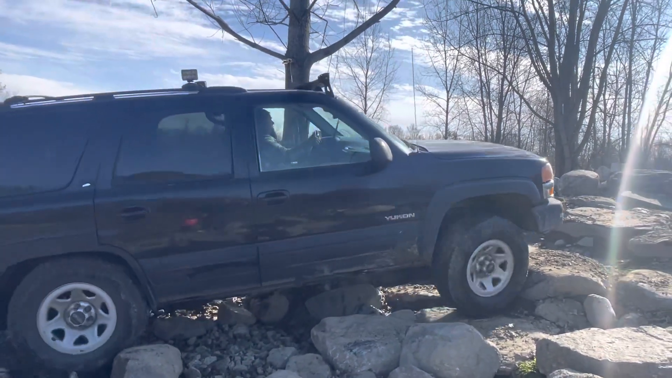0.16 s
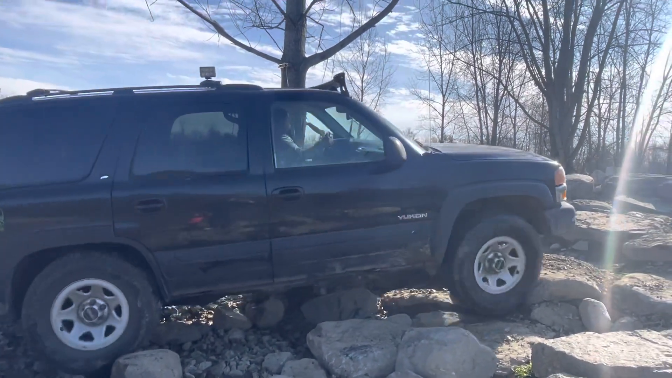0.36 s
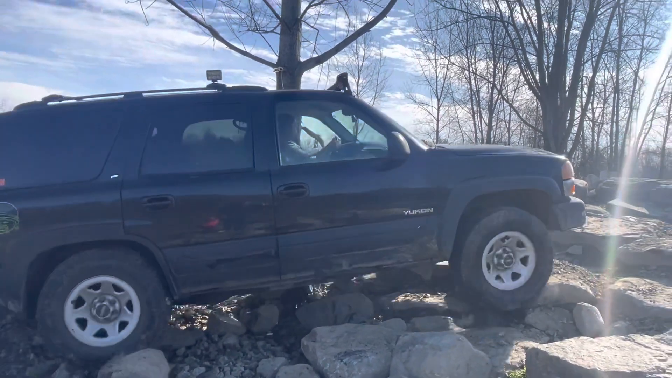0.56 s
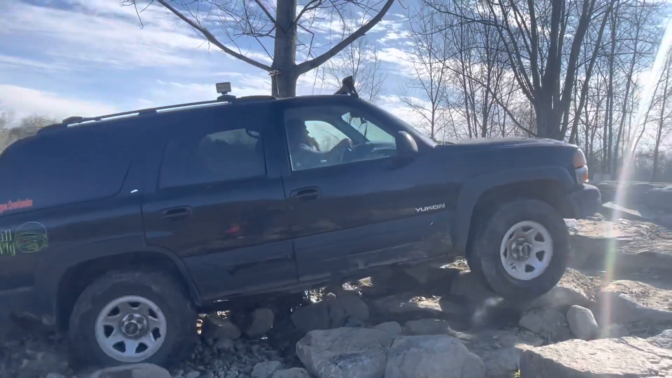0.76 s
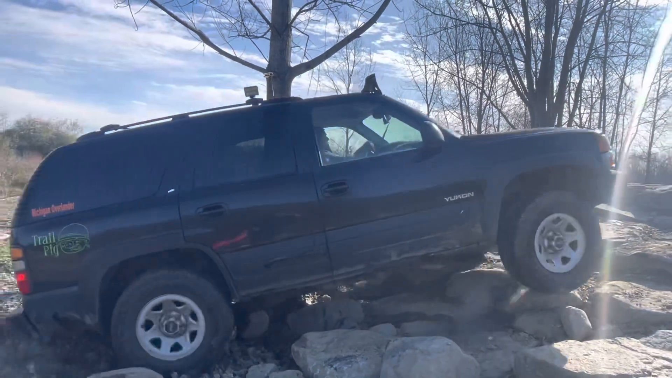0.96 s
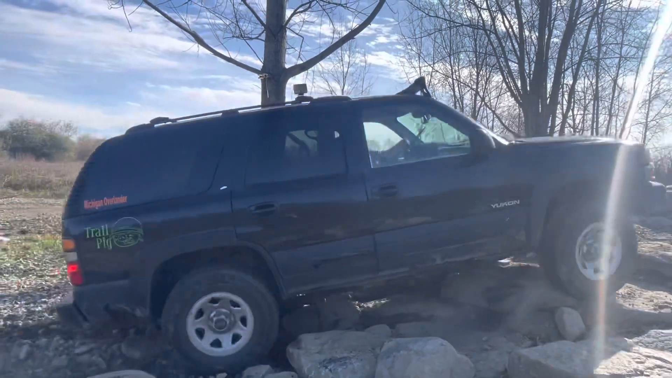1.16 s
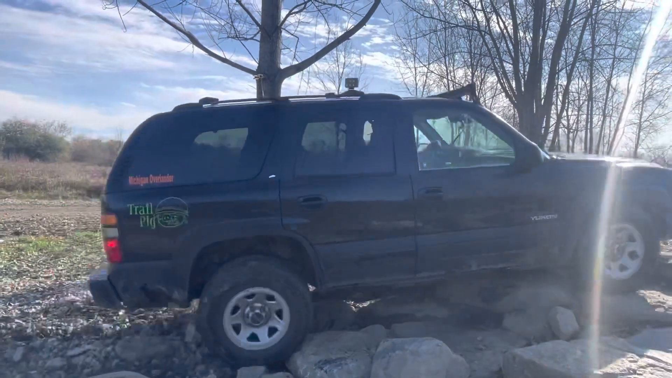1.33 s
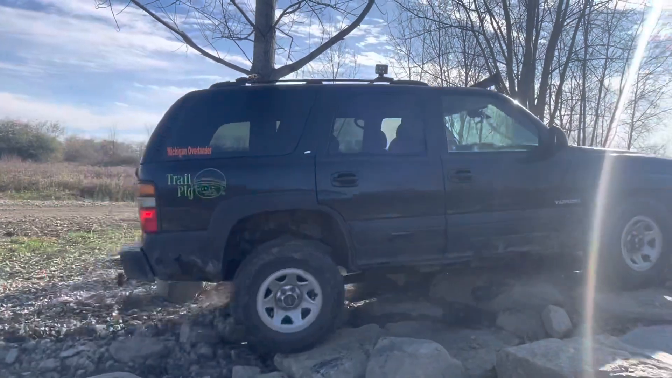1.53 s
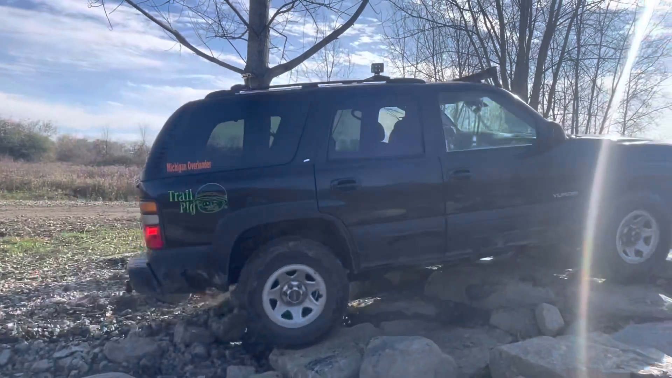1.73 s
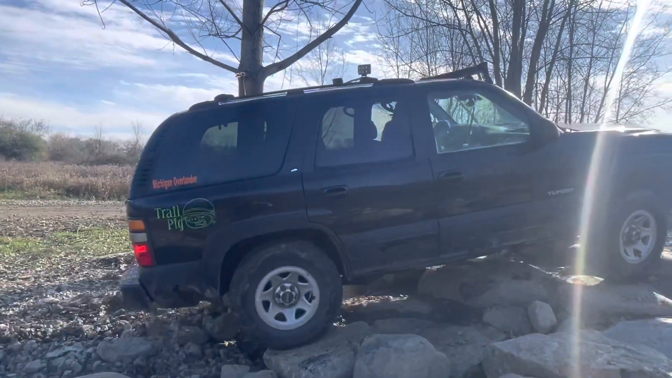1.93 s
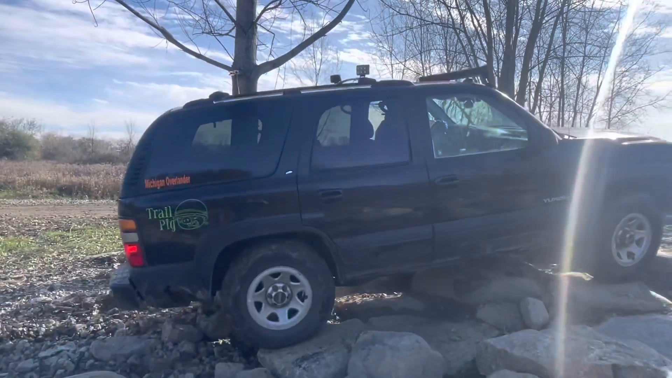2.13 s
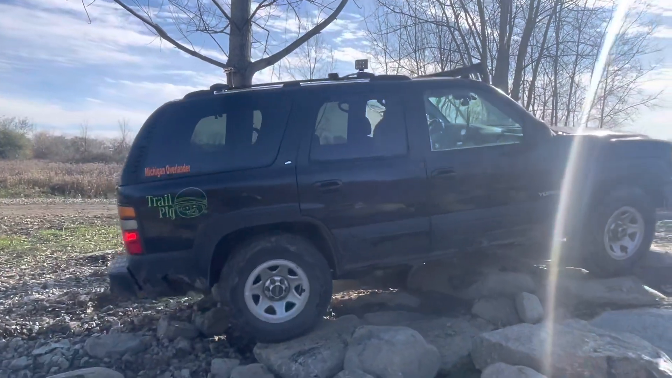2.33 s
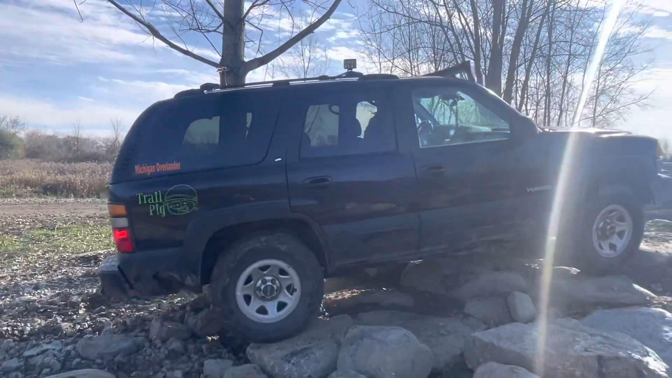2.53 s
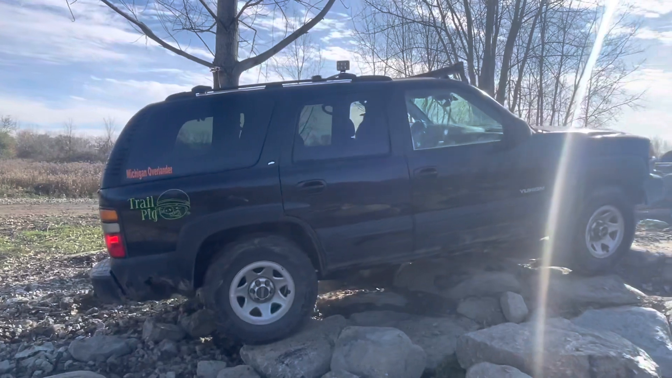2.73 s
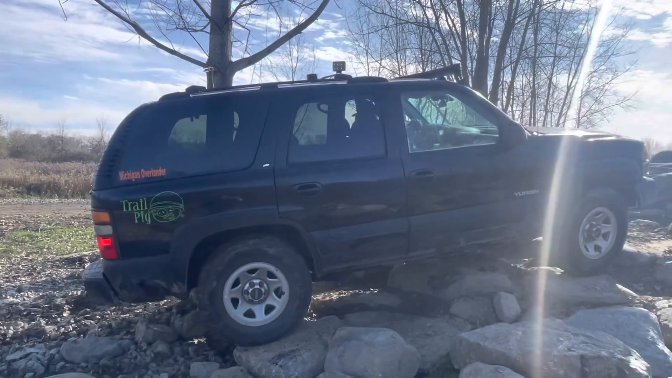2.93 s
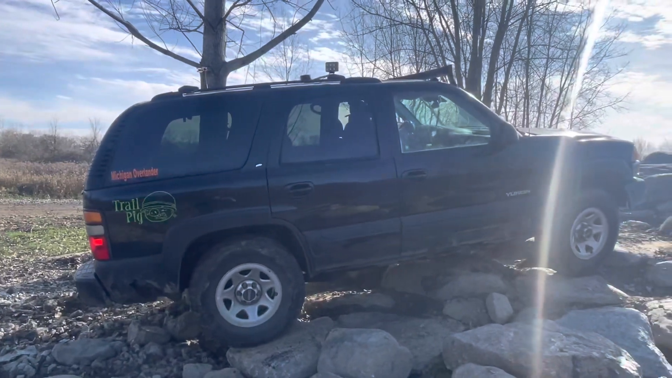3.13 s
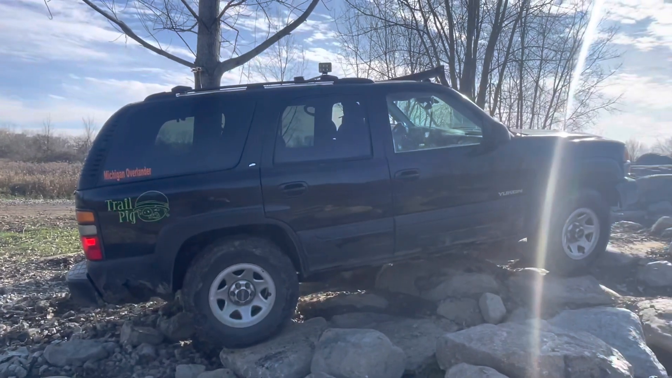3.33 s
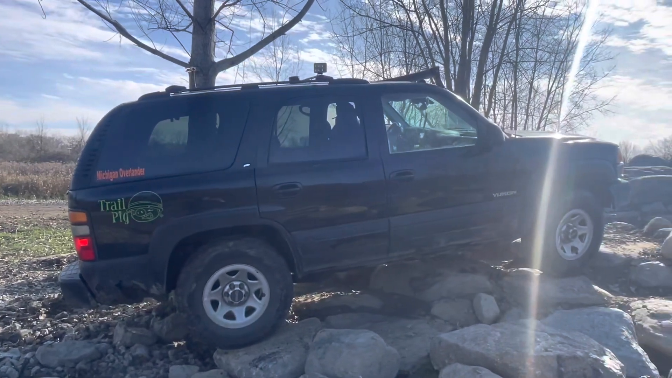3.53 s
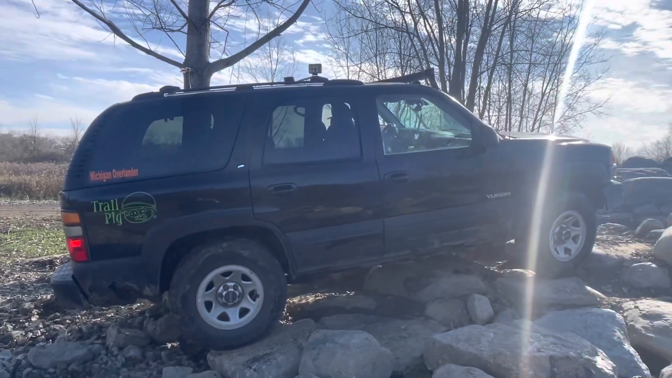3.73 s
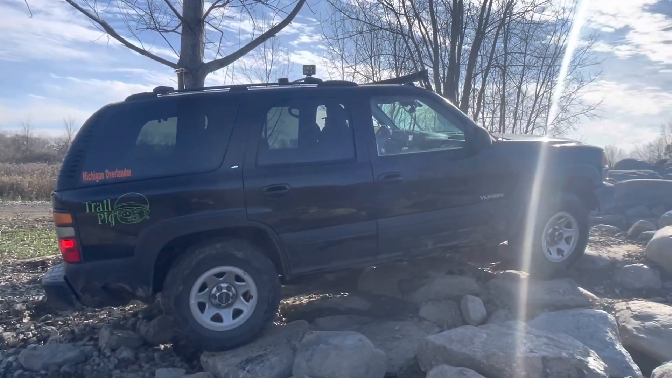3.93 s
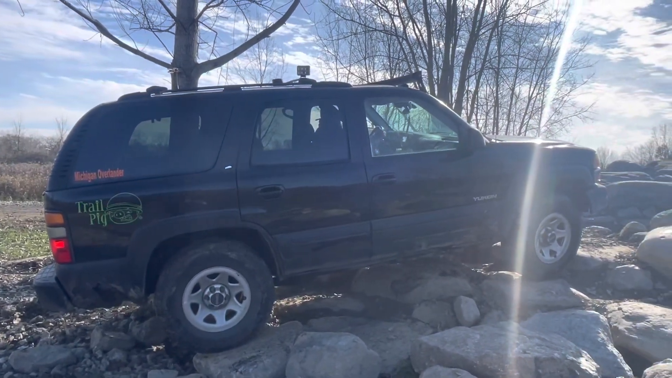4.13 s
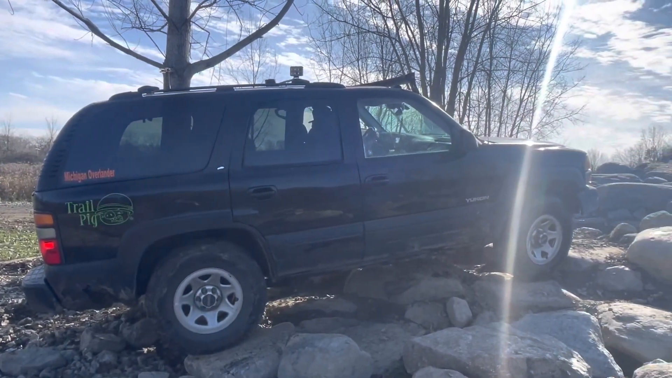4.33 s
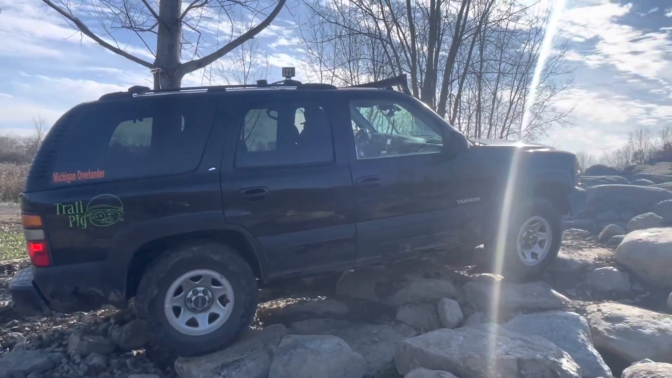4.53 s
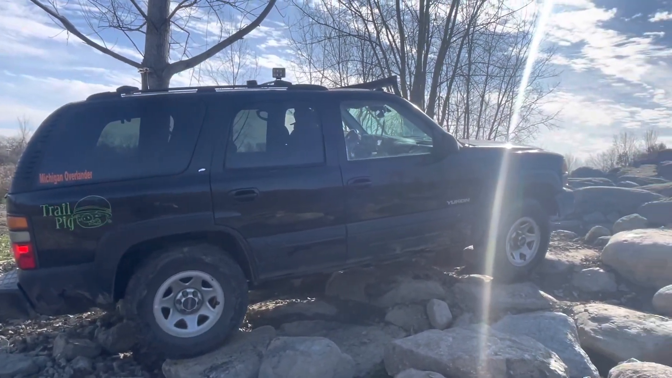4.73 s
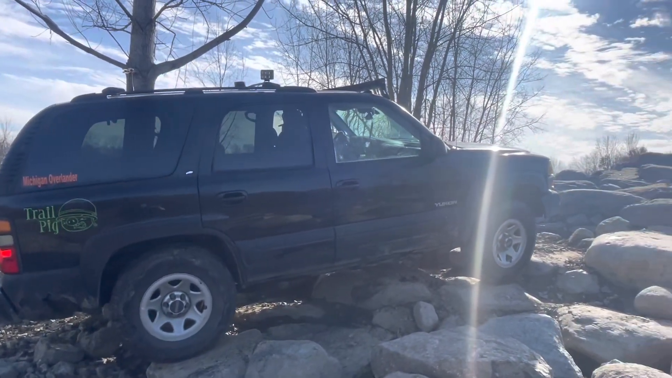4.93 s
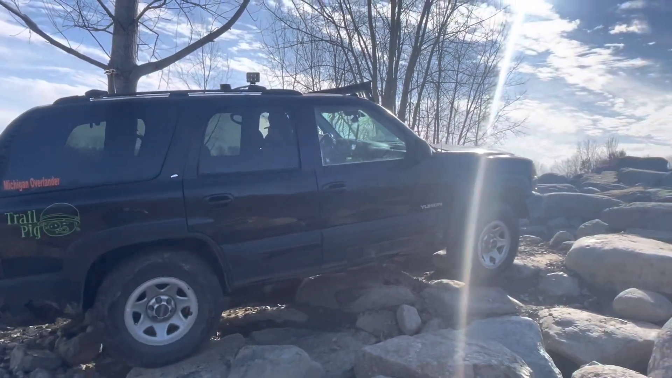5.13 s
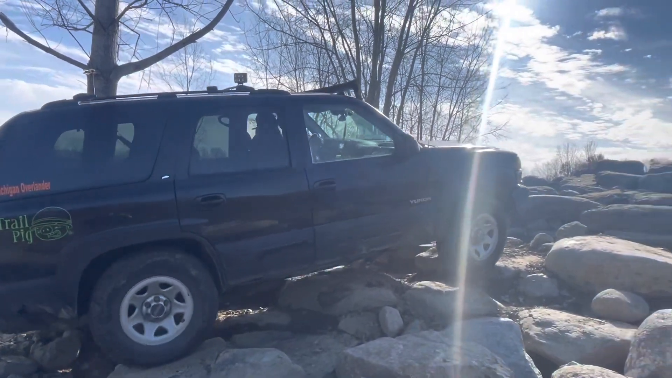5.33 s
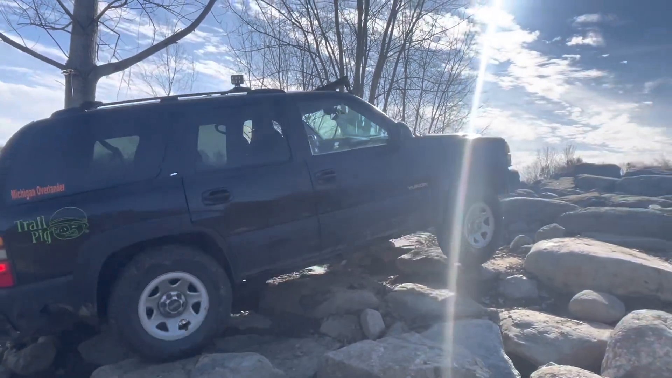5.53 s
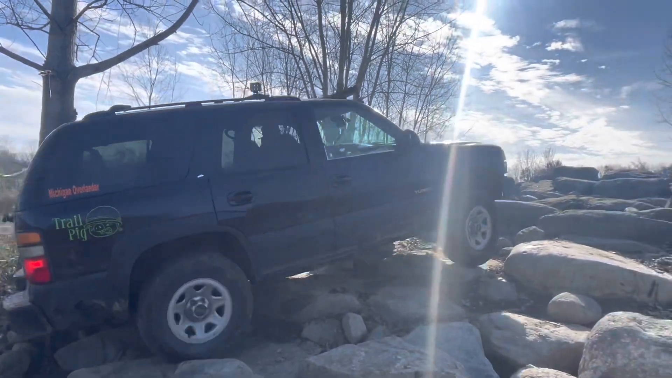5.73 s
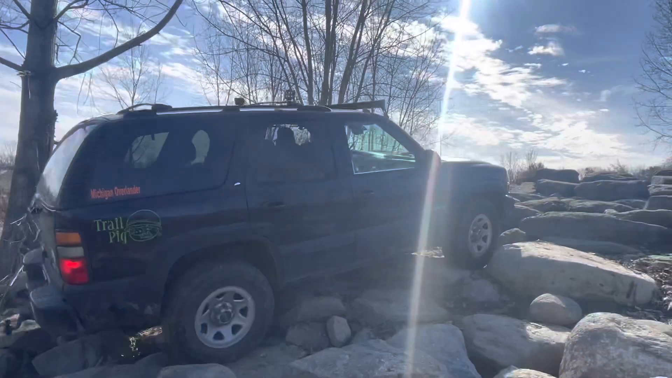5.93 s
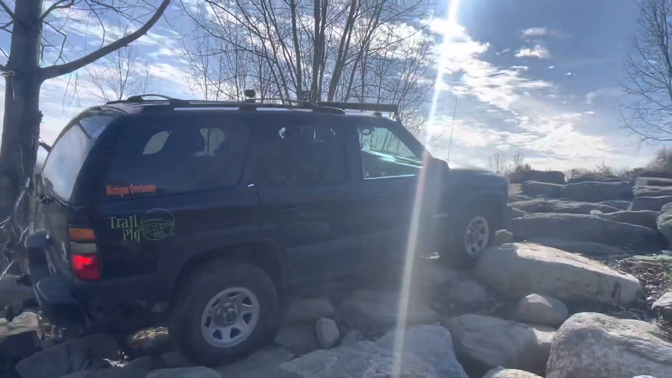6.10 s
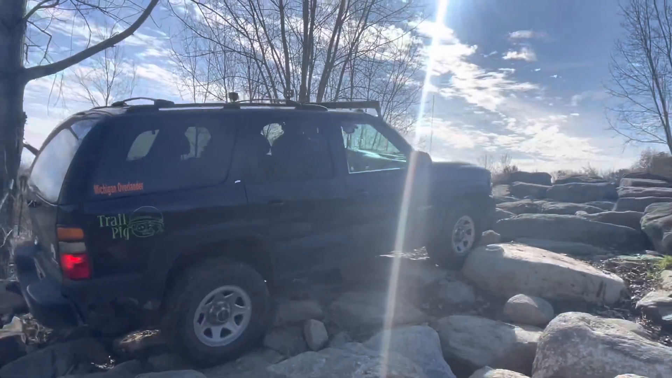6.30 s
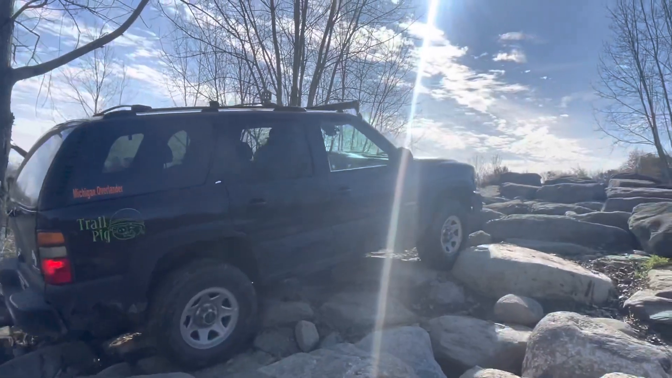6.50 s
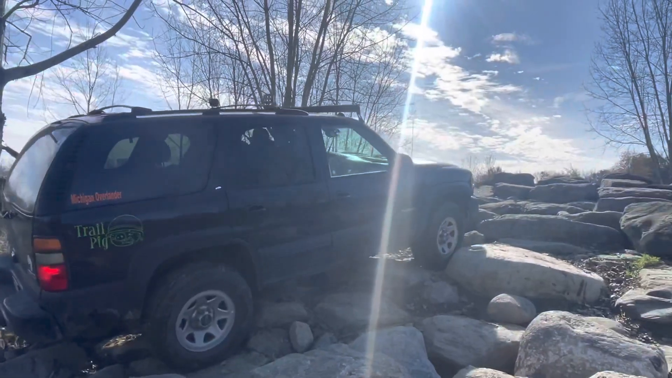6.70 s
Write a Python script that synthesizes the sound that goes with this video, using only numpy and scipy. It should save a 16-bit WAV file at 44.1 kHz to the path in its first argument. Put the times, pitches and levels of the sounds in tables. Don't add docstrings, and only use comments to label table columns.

```python
import sys
import numpy as np
from scipy import signal
from scipy.fft import rfft, irfft, next_fast_len
from scipy.io import wavfile
from scipy.ndimage import uniform_filter1d

SR = 44100
rng = np.random.default_rng(int(sys.argv[2]) if len(sys.argv) > 2 else 0)


def master(y):
    cut = np.clip(np.atleast_2d(y).T, -1, 1)
    pcm = np.round(cut * 32767)
    wavfile.write(sys.argv[1], SR, pcm.astype(np.int16))


def level_to_linear(level):
    exponent = np.asarray(level, float) / 20
    return 10 ** exponent


N = 302526
RUN_IN = 8820
EXIT_LAG_S = .0148
SLIP_DB = 2.8

# time in seconds, firings per second.
FIRING = [(0.0, 123.1), (0.13, 138.5), (0.42, 224.3), (0.65, 255.1), (0.8, 215.2), (0.98, 136.2),
          (1.22, 83.8), (1.88, 41.0), (2.25, 40.7), (2.6, 49), (2.85, 53), (3.1, 48.2), (3.35, 44.5),
          (4.1, 43.9), (4.2, 44.5), (4.67, 71.3), (5.05, 76.8), (5.42, 104.0), (5.85, 64.6), (6.3, 41.4),
          (6.86, 38.3)]
# time in seconds, level in dB.
LOAD = [(0, -9.5), (.3, -8), (.66, -4), (.78, -11), (.93, -19), (1.2, -30.5), (1.65, -33.5), (2.05, -32),
        (2.45, -28), (2.85, -26.5), (3.3, -29), (4.2, -26), (4.5, -17.5), (5.08, -13), (5.36, -12),
        (5.65, -17), (6.27, -28), (6.86, -24.5)]
# time in seconds, level in dB.
EFFORT = [(0, -33), (.3, -32.5), (.69, -28), (.9, -32.5), (1.2, -44), (1.72, -57), (2.05, -57.5),
          (2.37, -63), (4.15, -63), (4.4, -57.5), (5.1, -48), (5.27, -39.5), (5.39, -40), (5.56, -46.5),
          (6.04, -51), (6.57, -59.5), (6.86, -61)]
# time of full strength in seconds, strength 0 to 1, rise in seconds, fade in
# seconds.
UNEVEN_BOUTS = [
    (.5, 1, .25, .75),
    (5.4, .25, .3, .15),
]
NEAR_BANK = [0, 1, 0, 1, 1, 0, 1, 0]
CYLINDER_DB = [-1, 1, 0, .5, -1.5, -2, .5, 0]
LEAK_DB = [-16, -15, -5, -14, -15, 1, -13, -16]
# firings per second, boom, drone, rasp and shell in dB.
PIPE_BY_SPEED = [(39.3, -4.5, 0, -16, -29.5), (51.6, 0.5, -0.5, -14.5, -27), (79, -3.5, -1, -11, -24),
                 (87, -1, -0.5, -13.5, -20), (99.2, 1.5, -4.5, -10.5, -15.5), (136, -3.5, 4.5, -9.5, -14.5),
                 (202.5, -10, 0.4, -10.5, -18.5), (262, -13.5, -9, -14.5, -18)]
OVERRUN_DB = [-0.41, 0.23, 0.39, 0.0009, -1.6]
# frequency in Hz, width in Hz, level in dB.
BOOM = [(57.7, 20, 0.5), (102, 87, -10)]
# frequency in Hz, width in Hz, level in dB.
DRONE = [(112.5, 27.4, 0.06), (166.6, 31, 0.1)]
# frequency in Hz, width in Hz, level in dB.
TAIL_RING = [(190, 19.4, -0.28)]
# frequency in Hz, width in Hz, level in dB.
IDLE_RING = [(184, 24, 0)]
# firings per second, level in dB.
IDLE_RING_BY_SPEED = [(40, -6), (50, -3), (70, -2), (110, -7), (140, -30)]
# frequency in Hz, width in Hz, level in dB.
BARK = [(188, 83, 2.2), (265.5, 14, 3.7)]
# firings per second, level in dB.
BARK_BY_SPEED = [(45, -20), (68, -23), (103, -15), (125, -13.5), (175, -8), (230, 3)]
# frequency in Hz, width in Hz, level in dB.
RASP = [(247.6, 24.5, 1.5), (298.3, 47.3, 3), (375.6, 32.4, 6), (419.6, 51.6, 5), (470.6, 93, 0)]
# frequency in Hz, width in Hz, level in dB.
SHELL = [(617.3, 58, -2.5), (754.4, 34, 0), (822, 42.4, -2), (996, 290, -9.5)]
# frequency in Hz, width in Hz, level in dB.
ROAR = [(850, 29, 1.5), (694, 80, -16.5), (934, 77, 7), (785, 670, 0.5)]
# firings per second, level in dB against the shell modes.
ROAR_BY_SPEED = [(90, -28), (130, -2), (250, 9.5)]
MUFFLER_DIP_HZ = (204, 252)
TURN_S = (5.42, 5.94)
# multiple of firing, pipe mode in Hz, width in octaves, level in dB against load.
ORDERS_HEARD = [(2, 158, .3, -11.5), (2, 295, .2, -18), (1.375, 325, 0.2, -18.5), (4, 300, 0.13, -17),
                (3, 305, .12, -15.5)]
# frequency in Hz, width in Hz, level in dB.
PANELS = [(1890, 14, 7.7), (2170, 38, 11), (2260, 5.2, 4.3), (2770, 13, 1.7), (1300, 1670, 12)]
# frequency in Hz, width in Hz, level in dB.
PANEL_NOTE = [(1475, 14, -2.5), (1165, 26, -7)]
# firings per second, level in dB.
PANEL_NOTE_BY_SPEED = [(45, -15), (60, -5), (105, -2.5), (140, -12.5)]
# frequency in Hz, width in Hz, level in dB.
BAY = [(1400, 130, 4), (1608, 75, -1), (1980, 48, -4)]
# firings per second, level in dB against the panels.
BAY_BY_SPEED = [(110, -21), (170, -4), (250, -1)]
# frequency in Hz, width in Hz, level in dB.
BRACKETS = [(1410, 34, 5), (2700, 24, -0.5), (2877, 19, 0.5), (3040, 43, 3.5), (4180, 25, -0.5),
            (4591, 29, 2), (4985, 15, -2.5)]
# start in seconds, peak in dB, ring in Hz, snap in dB against the peak.
CRACKS = [(0.2257, -17.5, 1580, -10.5), (0.854, -20.5, 1410, -4.5), (1.051, -29.5, 3650, 0),
          (1.077, -14.5, 1710, -16.5), (1.0907, -35, 4700, 11), (1.1942, -38.5, 2160, 7.5),
          (1.2219, -24, 2090, -16), (1.258, -29.5, 1910, -2), (1.115, -45, 3720, 2),
          (1.303, -36.5, 3520, -9), (1.315, -33, 2030, -10), (1.338, -35, 2290, -13),
          (1.362, -42.5, 4000, -4), (0.951, -18, 1600, -8), (5.4896, -27, 2230, -8.5),
          (1.517, -37.5, 3080, -4.5), (1.677, -47.5, 5270, -1), (1.7051, -38.5, 5200, 3.5),
          (1.7985, -43.5, 1310, -2), (2.031, -30.5, 5850, 2.5), (2.125, -43, 5440, -4),
          (2.4594, -50.5, 2320, -3.5), (2.893, -53.5, 8600, -9), (4.089, -56, 5800, -11),
          (4.1615, -52, 5900, -11), (4.28, -58, 5500, -12), (5.47, -22, 2110, -28),
          (5.5088, -28, 1410, -7.5), (5.5452, -30, 5300, 0), (5.735, -35.5, 2300, -2.5),
          (5.9381, -33.5, 3100, -7), (5.969, -28, 3120, -29), (6.0172, -37, 3130, -9.5),
          (6.0744, -37, 2020, -27), (6.101, -53, 4130, 12), (6.2915, -44, 1930, -21),
          (6.351, -46, 3280, 2.5), (6.371, -44.5, 2800, -4), (6.515, -40, 2000, -9),
          (6.685, -47.5, 9500, -14), (6.7228, -37.5, 9600, -10)]
# start in seconds, level in dB.
KNOCKS = [(0.2251, -15), (1.1348, -23.5), (1.1918, -35.5), (5.47, -40), (5.509, -29), (5.5458, -30.5),
          (5.282, -23.5)]
# start in seconds, length in seconds, level in dB, ring in Hz, body in dB.
SCRAPES = [(0.684, 0.04, -30, 4800, -18.5), (0.835, 0.017, -30.5, 4540, -19.5),
           (0.906, 0.081, -35, 5300, -22.5), (1.06, 0.033, -59, 4230, -55),
           (1.302, 0.0096, -42.5, 3770, -52), (1.404, 0.041, -36, 2410, -34),
           (1.405, 0.021, -37.5, 5700, -53), (1.434, 0.021, -27, 4400, -40),
           (1.503, 0.019, -59.5, 7300, -40), (1.784, 0.028, -56.5, 2490, -45),
           (1.941, 0.17, -62, 6160, -52), (5.452, 0.087, -44, 2170, -52), (5.714, 0.082, -51, 1890, -38.5),
           (5.933, 0.076, -48, 2060, -38.5), (6.16, 0.033, -50.5, 2310, -49),
           (6.291, 0.09, -51.5, 1980, -48.5), (6.459, 0.05, -52.5, 5800, -44.5)]
# start in seconds, length in seconds, level in dB, note in Hz, width in Hz.
GROANS = [(1.403, 0.018, -27, 1680, 260), (1.408, .06, -31, 820, 220), (1.424, .06, -26.5, 352, 60),
          (1.43, 0.051, -35, 1810, 220), (0.99, .008, -36, 720, 100), (1.4, .36, -54.5, 770, 400),
          (5.485, .05, -40, 2040, 120), (1.3, 0.067, -40.5, 760, 430), (1.41, 0.065, -39, 2650, 780),
          (5.505, 0.021, -35, 950, 300), (6.065, 0.047, -32, 360, 87), (6.416, 0.032, -33.5, 300, 85),
          (6.458, .014, -34, 180, 67), (5.3, 0.024, -28.5, 290, 83), (6.49, 0.05, -61, 2000, 46),
          (.69, 0.021, -26.5, 2050, 91), (.33, 0.031, -25, 1570, 64)]
# start in seconds, length in seconds, level in dB, first Hz, last Hz.
SQUEAKS = [(5.722, .03, -44, 1750, 1800), (5.845, .022, -41, 1480, 1560), (5.935, .018, -43, 1800, 1850),
           (5.983, .026, -44, 1830, 1870), (6.018, .02, -46, 2000, 2050), (6.066, .035, -44, 1200, 1200),
           (6.138, .02, -48, 2900, 2500), (6.155, .024, -45, 1800, 2000), (6.178, .045, -46, 2500, 2300),
           (6.168, .04, -51, 3450, 3550), (6.218, .018, -46, 1850, 2050), (6.29, .045, -48, 1900, 1900),
           (6.31, .025, -50, 2800, 2800), (5.11, .03, -45, 2000, 1980), (5.0, .025, -50, 2350, 2350)]
# frequency in Hz, level in dB per Hz.
HISS = [(1060, -29.5), (1800, -20), (2030, -14.5), (2310, -15), (3790, -12.5), (5500, -11), (6790, -19.5),
        (9150, -13), (10200, -3.5), (11200, -7.5), (12400, -12.5), (16200, -77.5), (22000, -120)]
STEER_S = (2.78, 4.05)
# frequency in Hz, left-right likeness -1 to 1,
# share of the difference that is a phase lead, left excess in dB.
PORTS = [(40, .997, .9, 1.4), (80, .992, .9, 1.2), (130, .986, .8, 2.3), (240, .945, .6, 1.5),
         (350, .9, .5, .9), (600, .7, .4, .1), (1200, -.12, .3, -2.7), (2500, -.05, .1, 2.7),
         (5000, .22, .1, 5), (6800, -.3, .7, .5), (9900, -.65, .9, .1), (10300, .84, .6, .1)]
TOP_EDGES_HZ = [10400, 10800, 11300, 11800, 12250, 12600]
GATE_DB = [-69, -72, -72, -69, -63]


def engine():
    pulses, blended, leaks = pulse_trains()
    puffs = evened(signal.lfilter([1], [1, -.997], -leaks))
    gas = (1 + 0.015 * puffs) * rng.standard_normal((4, 2, N + RUN_IN))
    pipe = boom(blended) + drone(pulses, leaks) + rasp(pulses, leaks, gas)
    pipe = pipe + shell(pulses, gas) + orders() + brackets(gas)
    speed, = in_time(FIRING)
    swallowed = band(pipe, *MUFFLER_DIP_HZ, order=1)
    pipe = pipe - .6 * np.clip((92 - speed) / 12, 0, 1) * swallowed
    return pipe + panels(gas) + hiss(gas) + whine()


def crank():
    speed, = in_time(FIRING)
    return (np.cumsum(speed) - speed[0] * RUN_IN) / SR + 8.3


def throttle():
    change = uniform_filter1d(np.gradient(np.log2(in_time(FIRING)[0])) * SR, size=9000)
    t, uneven = np.arange(-RUN_IN, N) / SR, 0
    for s, strength, rise_s, fade_s in UNEVEN_BOUTS:
        rise = np.clip((t - s) / rise_s + 1, 0, 1)
        uneven = uneven + strength * rise * np.exp(-(np.clip(t - s, 0, 9) / fade_s) ** 2)
    return np.clip(change, 0, 1.5), np.clip(-change, 0, 2.5), uneven


def pulse_trains():
    pull, overrun, uneven = throttle()
    spread = cylinder_spread(uneven)
    far_db = -5.7 + 2.5 * pull - 4 * uneven - 5 * np.sqrt(uneven * (1 - uneven))
    rough_db = 1.6 - .8 * np.minimum(pull, 1) + .9 * uneven * overrun
    pulses = firings(CYLINDER_DB, spread, far_db, rough_db)
    pulses = pulses + .006 * rng.standard_normal(N + RUN_IN)
    blended = firings(CYLINDER_DB, spread ** 0, far_db, rough_db)
    blended = blended + .006 * rng.standard_normal(N + RUN_IN)
    leaks = firings(LEAK_DB, 1 / spread, 0 * far_db, rough_db / 2)
    return pulses, blended, np.roll(leaks, int(.003 * SR))


def cylinder_spread(uneven):
    return 1 + 4.5 * uneven


def firings(cylinder_db, spread, far_db, rough_db):
    far_pipe_s, jitter_s = .0008, .0001
    turns = crank()
    at = np.flatnonzero(np.diff(np.floor(turns)) > 0)
    cylinder = np.floor(turns[at + 1]).astype(int) % 8
    far = 1 - np.array(NEAR_BANK)[cylinder]
    chance = rng.standard_normal((1000, 2))[:len(at)]
    size_db = np.array(cylinder_db)[cylinder] * spread[at] + far * far_db[at]
    size_db = size_db + rough_db[at] * chance[:, 0]
    late_s = far * far_pipe_s + jitter_s * rough_db[at] * chance[:, 1]
    pulses = np.zeros(len(turns))
    pulses[np.clip(at + (late_s * SR).astype(int), 0, len(turns) - 1)] = -level_to_linear(size_db)
    return pulses - uniform_filter1d(pulses, size=3000)


def centred(pulses, modes, low_hz, high_hz, order):
    size = next_fast_len(len(pulses))
    shape = np.abs(rfft(band(resonate(np.arange(size) == 0, modes), low_hz, high_hz, order=order)))
    return np.roll(irfft(rfft(pulses, size) * shape, size), int(EXIT_LAG_S * SR))[:len(pulses)]


def pipe_db(part):
    (speed,), (load_db,) = in_time(FIRING), in_time(LOAD)
    share_db = at_hz(np.array(PIPE_BY_SPEED)[:, [0, part + 1]], speed)
    return load_db + share_db + OVERRUN_DB[part] * throttle()[1]


def pedal_cut():
    centre_s, width_s = 0.737, 0.06
    return np.exp(-((np.arange(-RUN_IN, N) / SR - centre_s) / width_s) ** 2)


def tail_turned():
    return in_time([(TURN_S[0], 0), (TURN_S[1], 1)])[0]


def boom(blended):
    _, overrun, uneven = throttle()
    wave = centred(np.roll(blended, int(.0019 * SR)), BOOM, 36.4, 117.0, order=3)
    return level_to_linear(pipe_db(0) - 10 * pedal_cut() + 2.5 * overrun * uneven) * evened(wave)


def drone(pulses, leaks):
    (speed,), (_, overrun, uneven) = in_time(FIRING), throttle()
    wave = centred(pulses, DRONE, 122, 171.6, order=5)
    wave = wave + resonate(wave, TAIL_RING)
    idle = resonate(resonate(pulses + 1.04 * leaks, IDLE_RING), IDLE_RING)
    idle_db = at_hz(IDLE_RING_BY_SPEED, speed) + 3.5 * overrun * np.clip((speed - 55) / 15, 0, 1)
    wave = evened(wave) + level_to_linear(idle_db) * evened(idle)
    wave = wave * np.sqrt(uniform_filter1d(centred(pulses, DRONE, 100, 200, order=4) ** 2, size=9000))
    wave = wave + tail_turned() * centred(pulses, DRONE, 116, 125, order=2)
    bark_db = at_hz(BARK_BY_SPEED, speed) + 1.0 - 0.5 * overrun * uneven
    wave = wave + level_to_linear(bark_db) * centred(pulses, BARK, 96, 256.0, order=3)
    return level_to_linear(pipe_db(1) - 3 * pedal_cut()) * evened(wave)


def rasp(pulses, leaks, gas):
    (speed,), (load_db,), turned = in_time(FIRING), in_time(LOAD), tail_turned()
    pull, _, uneven = throttle()
    spread = cylinder_spread(uneven)
    knocks = band(leaks, 385, 500) + 1.2 * band(np.roll(leaks, -600), 240, 310)
    knocks = 115 * np.clip((load_db + 33) / 5, .25, 1) / spread * knocks
    pulled = (35 + 50 * pull + 45 * np.clip((speed - 52) / 20, 0, 1)) / spread * band(pulses, 265, 330)
    idling = np.clip((64 - speed) / 12, .2, 1) * (1 - np.minimum(pull + uneven, 1))
    drive = gas[0] + knocks + pulled + 22 * idling * band(pulses, 210, 250)
    out = band(resonate(resonate(drive, RASP), RASP), 190, 575)
    out = out + turned * (band(out, 200, 400, order=3) - out)
    hum = evened(band(gas[3], 457, 637))
    return level_to_linear(pipe_db(2)) * (level_to_linear(-5 * turned) * evened(out) + turned * level_to_linear(-13) * hum)


def shell(pulses, gas):
    (speed,), turned, (pull, overrun, uneven) = in_time(FIRING), tail_turned(), throttle()
    drive = gas[3] + (16 + 45 * pull) / cylinder_spread(uneven) * pulses
    wall = band(resonate(resonate(drive, SHELL), SHELL), 540, 1250, order=3)
    rush = evened(band(gas[1], 480, 1000))
    roar = band(resonate(gas[1] + 14.0 * pulses, ROAR), 470, 1050) * level_to_linear(2.0 * drift(40))
    roar = level_to_linear(at_hz(ROAR_BY_SPEED, speed) + 28.5 * turned) * evened(roar)
    out = level_to_linear(-3.5 * overrun) * evened(wall) + level_to_linear(-22.5) * rush + roar
    turn_db = -4 * np.clip(8 * turned - .5, 0, 1) * np.minimum(overrun, 1)
    return level_to_linear(pipe_db(3) + turn_db) * evened(out)


def orders():
    (speed,), (load_db,), overrun = in_time(FIRING), in_time(LOAD), throttle()[1]
    turns, out = np.roll(crank(), int(EXIT_LAG_S * SR)), 0
    for k, hz, width, db in ORDERS_HEARD:
        level_db = load_db + db - 12 * overrun - 6 * (np.log2(k * speed / hz) / width) ** 2
        heard = (k * speed < 1.6 * hz) * (speed > 55)
        out = out - level_to_linear(level_db) * np.cos(2 * np.pi * k * turns) * heard
    return out


def panels(gas):
    (speed,), (effort_db,), overrun = in_time(FIRING), in_time(EFFORT), throttle()[1]
    plates = band(resonate(gas[1] * level_to_linear(1.5 * drift(30)), PANELS), 950, 2900)
    shield = level_to_linear(at_hz(PANEL_NOTE_BY_SPEED, speed) - 10 * overrun) * evened(resonate(gas[1], PANEL_NOTE))
    bay = evened(resonate(gas[3] * level_to_linear(1.9 * drift(45)), BAY))
    out = evened(plates) + shield + level_to_linear(at_hz(BAY_BY_SPEED, speed)) * bay
    return level_to_linear(effort_db + OVERRUN_DB[-1] * overrun) * out


def cracks():
    snap_s, ring_s, knock_s, rise_s = .035, .028, .065, .001
    out, t = np.zeros((2, N + 4000)), np.arange(4000) / SR
    for s, db, hz, snap_db in CRACKS:
        a, b = rng.standard_normal((2, 2, 4000))
        snap = rms_one(band(a, 540, 17000)) * level_to_linear(snap_db - 60 * t / snap_s)
        ring = rms_one(resonate(b, [(hz, hz * .15, 0)])) * level_to_linear(1.0 - 60 * t / ring_s)
        ring = ring * np.clip(t / rise_s, 0, 1)
        out[:, int(s * SR):int(s * SR) + 4000] += level_to_linear(db) * (snap + ring)
    for s, db in KNOCKS:
        blow = rng.standard_normal((2, 4000)) + 12.4 * (t == 0)
        knock = rms_one(resonate(blow, [(406, 102, 6), (865, 590, -13)]))
        out[:, int(s * SR):int(s * SR) + 4000] += knock * level_to_linear(db - 60 * t / knock_s)
    return out[:, :N]


def scrapes():
    out, t = np.zeros((2, N)), np.arange(9000) / SR
    for s, length_s, db, hz, low_db in SCRAPES:
        stroke = np.clip(t / .012, 0, 1) * level_to_linear(-60 * np.clip(t - length_s, 0, 1) / .12)
        slips = rng.standard_normal((2, 9000)) * level_to_linear(SLIP_DB * np.repeat(rng.standard_normal(100), 90))
        ring = rms_one(resonate(slips, [(hz, hz * .1, 0), (hz / 2, hz * .06, -3)]))
        broad_db = -5.5 + 27 * max(np.log2(hz / 4400), 0)
        bright = ring + level_to_linear(broad_db) * rms_one(band(slips, 1300, 9800))
        body = rms_one(resonate(slips, [(351, 50, 10), (795, 470, -1.0), (1680, 130, -7.0)]))
        at = int(s * SR)
        out[:, at:at + 9000] += stroke * (level_to_linear(db) * bright + level_to_linear(low_db) * body)
    return out


def groans():
    out = np.zeros((2, N))
    for s, length_s, db, hz, width_hz in GROANS:
        t = np.arange(int((length_s + .06) * SR)) / SR
        stroke = np.clip(t / .01, 0, 1) * level_to_linear(-60 * np.clip(t - length_s, 0, 1) / .09)
        uneven = np.repeat(rng.standard_normal(100), 200)[:len(t)]
        slips = rng.standard_normal((2, 20000))[:, :len(t)] * level_to_linear(SLIP_DB * uneven)
        mode = [(hz, 1.5 * width_hz, 0)]
        note = resonate(resonate(slips, mode), mode)
        note = note / np.sqrt(uniform_filter1d(note ** 2, size=700) + 1e-20)
        out[:, int(s * SR):int(s * SR) + len(t)] += level_to_linear(db) * stroke * note
    return out


def squeaks():
    out = np.zeros((2, N))
    for s, length_s, db, from_hz, to_hz in SQUEAKS:
        u = np.linspace(0, 1, int(length_s * SR))
        waver = 1 + .07 * np.repeat(rng.standard_normal((2, 60)), 66, axis=1)[:, :len(u)]
        turns = np.cumsum((from_hz + (to_hz - from_hz) * u) * waver, axis=1) / SR
        glide = np.sin(np.pi * u) ** .5 * np.sin(2 * np.pi * turns)
        out[:, int(s * SR):int(s * SR) + len(u)] += level_to_linear(db) * glide
    return out


def hiss(gas):
    (effort_db,), size = in_time(EFFORT), N + RUN_IN
    colour = level_to_linear(at_hz(HISS, np.fft.rfftfreq(size, 1 / SR)))
    ticks = (rng.random(size) < 900 / SR) * level_to_linear(0.94 * rng.exponential(1, size))
    ticks = ticks * rng.standard_normal((2, size))
    noise = rms_one(gas[2]) * level_to_linear(2.2 * drift(20)) + level_to_linear(-7) * rms_one(ticks)
    return level_to_linear(effort_db) * evened(irfft(rfft(noise) * colour, size))


def brackets(gas):
    effort_db, = in_time(EFFORT)
    return level_to_linear(effort_db - 15 + 3.0 * drift(8.4)) * rms_one(resonate(gas[2], BRACKETS))


def whine():
    (speed,), (effort_db,), (pull, overrun, _) = in_time(FIRING), in_time(EFFORT), throttle()
    start_s, end_s = STEER_S
    steering, = in_time([(start_s - .3, 0), (start_s, 1), (end_s, 1), (end_s + .3, 0)])
    level_db = -75 + .6 * (np.clip(effort_db, -63, -50) + 63) - 8 * np.maximum(overrun - .5, 0)
    level_db = level_db + 2.5 * pull + 2.5 * drift(35) + 10 * steering
    belt_slip = 1 + .022 * drift(60) + .003 * drift(6)
    return level_to_linear(level_db) * np.sin(2 * np.pi * 29.6 * np.cumsum(speed * belt_slip) / SR)


def rms_one(x):
    return x / np.sqrt(np.mean(x ** 2) + 1e-20)


def evened(x):
    return x / np.sqrt(uniform_filter1d(uniform_filter1d(x ** 2, size=7000), size=7000) + 1e-20)


def in_time(rows):
    s, *columns = np.transpose(rows)
    return [np.interp(np.arange(-RUN_IN, N) / SR, s, c) for c in columns]


def at_hz(points, hz):
    points = np.array(points)
    return np.interp(np.log(hz + 1), np.log(points[:, 0]), points[:, 1])


def drift(rate):
    knots = rng.standard_normal(N // 200)
    return np.interp(np.arange(N + RUN_IN) / SR * rate, np.arange(len(knots)), knots) * 1.4


def band(x, low_hz, high_hz, order=2):
    return signal.sosfilt(signal.butter(order, [low_hz, high_hz], "band", fs=SR, output="sos"), x)


def resonate(x, modes):
    out = 0
    for k, (hz, width_hz, db) in enumerate(modes):
        r = np.exp(-np.pi * width_hz / SR)
        top = (1 - r * r) / 2 * level_to_linear(db) * (-1) ** k
        out = out + signal.lfilter([top, 0, -top], [1, -2 * r * np.cos(2 * np.pi * hz / SR), r * r], x)
    return out


def ports(x):
    hz, curves = np.fft.rfftfreq(N, 1 / SR), np.array(PORTS)
    alike, lead, left_db = (at_hz(curves[:, [0, k]], hz) for k in (1, 2, 3))
    alike, lead = np.clip(alike, -1, 1), np.clip(lead, 0, 1)
    direct = rfft(x[0])
    scattered = rfft(np.roll(x[1], int(.007 * SR)))
    apart = np.sqrt((1 - alike) / 2) * (np.sqrt(lead) * 1j * direct + np.sqrt(1 - lead) * scattered)
    direct = direct * np.sqrt((1 + alike) / 2)
    level = np.sqrt(2 / (1 + alike))
    left, right = (direct + apart) * level_to_linear(left_db / 2), (direct - apart) * level_to_linear(-left_db / 2)
    return irfft(level * np.array([left, right]), N)


def scene():
    return ports(engine()[:, RUN_IN:] + cracks() + scrapes() + groans() + squeaks())


def roll_off(x):
    return signal.sosfilt(signal.butter(12, 12600, fs=SR, output="sos"), x)


def record(dry):
    x = np.tanh(dry / .93)
    out = signal.sosfilt(signal.cheby2(18, 45, 9900, fs=SR, output="sos"), x)
    shared_luck = drift(7)[:N]
    loud_db = 10 * np.log10(uniform_filter1d(x[0] ** 2, size=9000) + 1e-9)
    for low_hz, high_hz, gate_db in zip(TOP_EDGES_HZ, TOP_EDGES_HZ[1:], GATE_DB):
        strip, luck = band(x, low_hz, high_hz, order=4), drift(30)[:N]
        strip_db = 10 * np.log10(uniform_filter1d(strip[0] ** 2, size=900) + 1e-14) + 2.5 * luck
        strong = strip_db > gate_db + .25 * (loud_db + 15)
        lucky = .8 * shared_luck + .6 * luck > -.3
        out = out + level_to_linear(-11.5) * uniform_filter1d(strong * lucky * 1., size=300) * strip
    hz = np.fft.rfftfreq(N, 1 / SR)
    out = irfft(rfft(out) * ((hz < 9950) | (hz > 10350)), N)
    return roll_off(out)


dry = scene()
out = record(dry)
master(out)
```